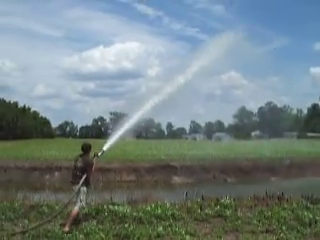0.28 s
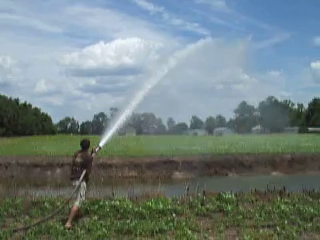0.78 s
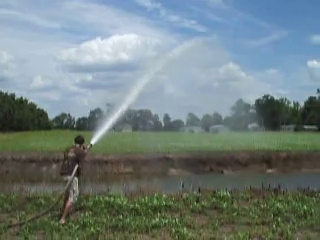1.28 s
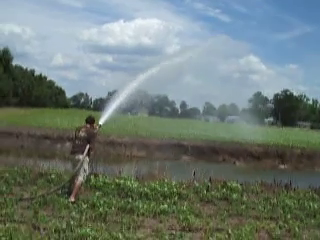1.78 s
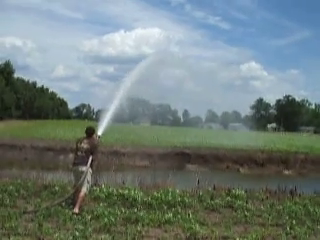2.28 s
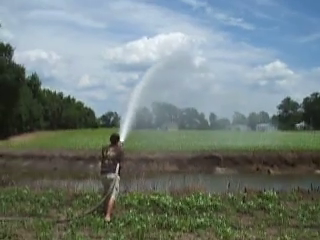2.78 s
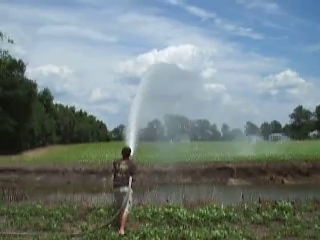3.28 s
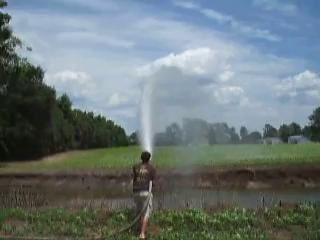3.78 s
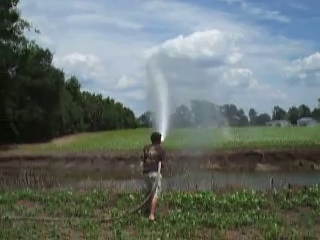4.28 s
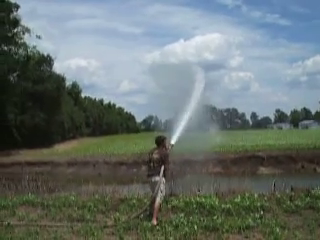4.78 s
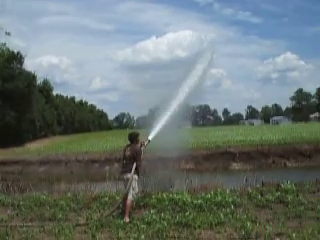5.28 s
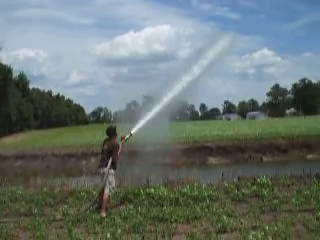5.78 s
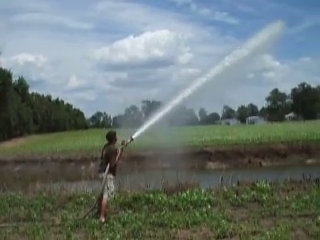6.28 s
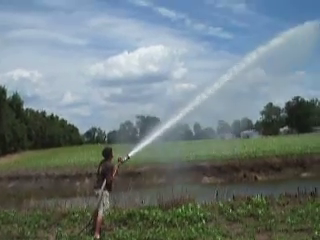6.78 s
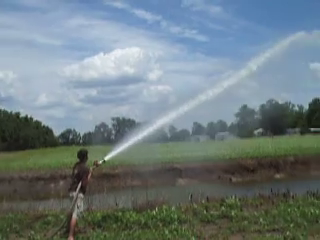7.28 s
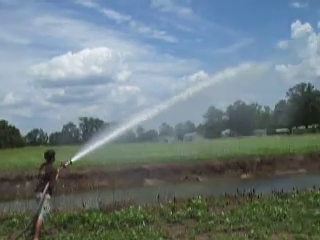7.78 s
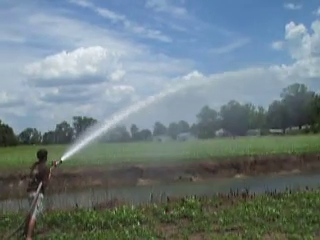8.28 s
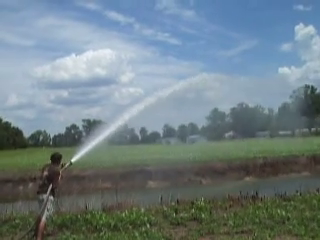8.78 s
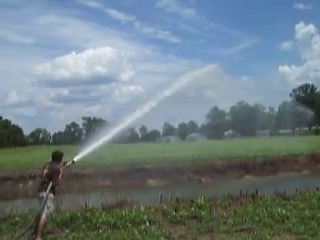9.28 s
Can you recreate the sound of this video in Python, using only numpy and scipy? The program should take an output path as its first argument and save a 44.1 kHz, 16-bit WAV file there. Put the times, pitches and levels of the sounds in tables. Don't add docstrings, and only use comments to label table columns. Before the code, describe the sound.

Outdoors in an open field, a parked truck engine holds a steady, droning roar while driving a water pump with a thin whine. A powerful hose stream hisses and splashes onto a pond throughout. Strong wind thumps and flutters on a small mono microphone for nearly three seconds, then mostly calms. The engine grows clearer around three seconds as the microphone turns, and its automatic gain dips slightly after peaks.

```python
import sys
import numpy as np
from scipy import signal
from scipy.fft import rfft, irfft, next_fast_len
from scipy.io import wavfile
from scipy.ndimage import uniform_filter1d

SR = 44100
rng = np.random.default_rng(int(sys.argv[2]) if len(sys.argv) > 2 else 0)


def master_out(mix):
    frames = np.transpose(np.atleast_2d(mix))
    ceiling = np.clip(frames, -1, 1)
    pcm = np.round(ceiling * 32767).astype(np.int16)
    wavfile.write(sys.argv[1], SR, pcm)


def convert_level_to_amplitude(level_db):
    exponent = np.asarray(level_db, float) / 20
    return 10 ** exponent


N = 422037

# (time [s], full firing cycles per second [Hz])
ENGINE_SPEED = [(0.0, 23.316), (1.5, 23.399), (3.0, 23.432), (4.5, 23.469), (6.0, 23.515), (7.5, 23.556),
                (8.5, 23.58), (9.57, 23.61)]
# (multiple of the cycle rate [1], level [dB])
ENGINE_ORDERS = [(3, -16.5), (4, -23), (5, -2.5), (6, -10.5), (7, -16), (8, -5), (9, -12), (10, -15.5),
                 (11, -20), (12, 0.5), (13, -12.5), (14, -5.0), (15, -12.5), (16, -8.5), (17, -16.5),
                 (18, -8.5), (20, -14), (22, -6.5), (23, -14.5), (25, -14.5), (26, -16), (27, -11.5),
                 (28, -9.5), (29, -16), (30, -14), (32, -10), (36, -10), (40, -14.5), (42, -15.5),
                 (48, -12)]
# (frequency [Hz], level [dB])
ROAR_COLOUR = [(25, -24), (60, -26), (130, -17), (250, -7.5), (400, -2.5), (700, 0), (950, -3),
               (1300, -7.5), (2000, -16)]
# (frequency [Hz], width [Hz], share added [1])
GROUND_ECHO = [
    (556, 60, -0.28),
    (680, 120, 0.033),
    (810, 50, -.2),
]
# (time [s], facing [dB], panel [dB])
FACING = [(0, -2, 7), (0.6, -0.5, 1), (1.1, -2, 7), (1.6, -1, 0.5), (2.1, -1.5, 3.5), (2.7, 0.5, 7),
          (3.15, 3, 10.5), (3.55, 0.5, -0.5), (4.1, 1.5, 8), (4.5, 2.5, 4.5), (4.85, -1, 4.5),
          (5.6, -1, 3.5), (6.15, 0.3, 2), (6.6, 0, 1), (7.3, -0.5, 1), (8.0, 0, 1), (8.8, 0.5, -3),
          (9.57, -1.5, -5)]
# (multiple of the cycle rate [1], level under the mesh [dB])
GEAR_ORDERS = [(68, -8), (74, -11), (78, -4.5), (88, -9), (90, -1), (92, -8), (94, -9)]
# (frequency [Hz], level [dB])
SPLASH_COLOUR = [(500, -22), (900, -8), (1150, 1), (1400, -2), (1800, -1), (2200, -2.5), (2800, -7.5),
                 (3600, -20)]
SPRAY_COLOUR = [(1400, -14.5), (2200, -4.5), (2800, -1), (3500, -1), (4400, -4.5), (5600, -11),
                (7000, -20.5)]
HISS_COLOUR = [(2800, -18.5), (3500, -10.5), (4400, -8), (5600, 2.5), (7000, -0.5), (9500, 1.5)]
# (time [s], share landing on the pond [dB], breakup into fine spray [dB])
AIM = [(0, 0, -1), (0.5, -1, -1.5), (1.35, 1, 0), (1.68, 3, 2), (1.85, 0.5, 0.5), (2.45, 0.5, 0.5),
       (2.7, 0.5, 1.5), (4.0, 0, 1), (4.45, 0.7, 2), (4.65, -0.5, 3), (4.95, 2, 3.5), (5.15, 2, 1),
       (5.75, 1.5, 2), (6.3, 2, 1.5), (7.0, -0.5, 1.3), (7.17, 2, 2), (8.6, 1.5, 1), (9.57, 0.5, 1)]
# (start [s], length [s], rumble level [dB])
GUSTS = [(0.0, 2.8, -43), (4.5, 1.1, -49.5), (0.0, 0.3, -34), (0.36, 0.19, -39.5), (0.622, 0.27, -36),
         (0.94, 0.1, -33), (1.3, 0.16, -42), (1.576, 0.26, -38), (1.962, 0.22, -33.5), (2.188, 0.33, -32.5),
         (2.65, 0.7, -46), (3.866, 0.78, -41), (5.1, 0.2, -47), (5.55, 0.27, -48), (6.82, 0.12, -39),
         (7.3, 0.17, -54), (7.8, 0.25, -47), (8.16, 0.4, -48)]
# (time [s], peak level [dB], pitch [Hz])
PUFFS = [(0.07, -19.5, 156), (0.119, -24.5, 168), (0.171, -14.5, 130), (0.445, -32, 200), (0.492, -10, 257),
         (0.619, -16.5, 143), (0.669, -22, 156), (0.74, -20, 123), (0.83, -21.5, 121), (0.86, -28, 163),
         (0.945, -24.5, 110), (0.981, -16.5, 150), (0.996, -22.5, 130), (1.405, -22, 157),
         (1.651, -20, 183), (1.71, -22.5, 164), (1.767, -24, 149), (1.924, -23, 131), (1.967, -26.5, 107),
         (2.023, -24, 127), (2.049, -15, 163), (2.132, -25, 161), (2.219, -20, 163), (2.271, -14.5, 165),
         (2.312, -16, 197), (2.37, -17.5, 164), (2.44, -22.2, 194), (2.468, -17, 200), (2.791, -18, 191),
         (3.891, -23, 121),
         (0.474, -26, 260), (0.503, -23, 210), (0.77, -26, 54.7), (1.03, -22.5, 70), (1.629, -26.5, 65),
         (2.085, -19, 149), (2.325, -15, 350), (2.346, -33, 260), (2.49, -22, 76), (3.972, -31.5, 70),
         (4.26, -19.5, 128), (4.41, -31, 69.6), (4.541, -34, 90), (5.22, -41, 60), (6.89, -34, 60)]
# (frequency [Hz], level [dB])
RUMBLE_COLOUR = [(20, -19), (40, -4), (60, -3), (90, -5), (120, -8.0)]
FLUTTER_COLOUR = [(80, -6.5), (120, -3), (180, -1), (260, -2), (360, -8), (500, -11), (800, -27)]
# (time [s], drop [dB], negative where the gain lifts instead)
DUCKS = [(0.17, 4), (0.5, -0.5), (1.0, 3), (1.41, 1.2), (1.72, 1), (2.06, 0.5), (2.33, 1.2), (2.48, -0.7),
         (3.5, 0.4), (3.97, 0.4), (4.43, 1), (4.79, 1), (5.439, 1), (6.03, 0.5), (6.41, 0), (6.9, 0.5),
         (7.239, 2.5), (8.0, 0.3), (8.62, -1.1), (9.24, -0.5)]
# (frequency [Hz], level [dB])
HOUSING = [(800, -0.5), (870, 1.0), (950, -1), (1300, -1.6), (1600, 0), (1780, 1.5), (1930, -1.7),
           (2100, 0.0), (2700, 0), (2900, 0.5), (3100, -0.65), (3550, 0.4), (3780, -1), (4200, 1)]
# (frequency [Hz], level [dB])
SMOOTHING = [(5000, 0.0), (6400, 1), (6900, 0), (7400, -5.5), (7900, -11), (8400, -19), (8800, -30.5),
             (9150, -42), (9400, -88)]
EDGES_HZ = 20 * 2 ** np.arange(0, 9.1, 1 / 3)

TONE_DB, ROAR_DB, WHINE_DB = -30.5, -26, -40.5
TONE_FOLLOWS, LOW_FOLLOWS, FOLLOWS_850, ROAR_FOLLOWS, WHINE_FOLLOWS = 0.6, 0.42, 1.7, 0.56, 0.3
SPLASH_DB, SPRAY_DB, HISS_DB = -28, -31.5, -33
HISS_FOLLOWS = 0.8
SPRAY_SHADOWED = 0.5
NOZZLE_TURNS_S, NOZZLE_FADE_DB_PER_S = 5.1, 0.4
GUST_EDGE_S, CALM_DB = 0.11, -53
FLUTTER_OVER_RUMBLE_DB, CALM_FLUTTER_DB = 2.5, -38.5
SHED_DB, SHED_SHARE, SHED_S = -23.5, 0.41, 0.03
DUCK_ATTACK_S, DUCK_RECOVERY_S = 0.0096, 0.38
CONVERTER_HZ = 16000
OFFSET = -0.0704


def engine(turns):
    facing_db, panel_db = in_time(FACING)
    own_db = {32: panel_db - TONE_FOLLOWS * facing_db, 36: FOLLOWS_850 * facing_db}

    def bearing_db(order):
        return own_db.get(order, LOW_FOLLOWS * facing_db * (order < 8))

    throb_db = 1.0 * np.sin(4 * np.pi * turns) + 0.25 * np.sin(2 * np.pi * turns)
    noise = coloured(ROAR_COLOUR, shared_db=1.02, own_db=0.65, shared_rate=7.0, own_rate=2.6)
    direct = convert_level_to_amplitude(ROAR_DB + ROAR_FOLLOWS * facing_db + throb_db) * noise
    roar = direct.copy()
    for hz, width_hz, share in GROUND_ECHO:
        roar += share * signal.lfilter(*signal.iirpeak(hz, hz / width_hz, SR), direct)
    orders = tones(turns, ENGINE_ORDERS, 0.2, 0.004, bearing_db)
    return convert_level_to_amplitude(TONE_DB + TONE_FOLLOWS * facing_db) * orders + roar


def tones(turns, orders, wobble_db, slip, bearing_db):
    out = np.zeros(N)
    for order, level_db in orders:
        phase = 2 * np.pi * (order * turns + start_turn(order)) + slip * order * drift(3.3)
        swell_db = wobble_db * np.sqrt(order) * drift(2.8)
        level = np.sqrt(2) * convert_level_to_amplitude(level_db + bearing_db(order) + swell_db)
        out += level * np.cos(phase)
    return out


def start_turn(order):
    loose = rng.random()
    if order <= 10:
        return 0.27 * (order - 4.4) + 0.28 * (order == 8)
    if order <= 18:
        return -0.3 * (order % 2)
    return loose


def pump(turns):
    facing_db = in_time(FACING)[0]
    whine = tones(turns, GEAR_ORDERS, 0.25, 0.0042, lambda order: 0)
    return convert_level_to_amplitude(WHINE_DB + WHINE_FOLLOWS * facing_db) * whine


def water(turns):
    landing_db, breakup_db = in_time(AIM)
    aside_db = NOZZLE_FADE_DB_PER_S * np.maximum(np.arange(N) / SR - NOZZLE_TURNS_S, 0)
    ripple_db = 0.25 * np.sin(2 * np.pi * turns)
    splash = coloured(SPLASH_COLOUR, shared_db=-0.1, own_db=0.18, shared_rate=11.0, own_rate=6.5)
    splash *= convert_level_to_amplitude(SPLASH_DB + landing_db)
    spray = coloured(SPRAY_COLOUR, shared_db=0.5, own_db=0.5, shared_rate=6.0, own_rate=6.7)
    spray *= convert_level_to_amplitude(SPRAY_DB + breakup_db - SPRAY_SHADOWED * in_time(FACING)[0])
    hiss = coloured(HISS_COLOUR, shared_db=0.4, own_db=0.5, shared_rate=9.0, own_rate=6.3)
    hiss *= convert_level_to_amplitude(HISS_DB + HISS_FOLLOWS * breakup_db - aside_db)
    return convert_level_to_amplitude(ripple_db) * (splash + spray + hiss)


def wind():
    gust = gust_level()
    rumble = coloured(RUMBLE_COLOUR, shared_db=-2.5, own_db=-0.5, shared_rate=14.0, own_rate=5.7)
    rumble = evened(rumble, seconds=0.26)
    flutter = coloured(FLUTTER_COLOUR, shared_db=2.0, own_db=0.5, shared_rate=13.0, own_rate=17.0)
    flutter = evened(flutter, seconds=0.076)
    thumps, shed_power = eddies()
    flutter_power = shed_power + (convert_level_to_amplitude(FLUTTER_OVER_RUMBLE_DB) * gust) ** 2 + convert_level_to_amplitude(2 * CALM_FLUTTER_DB)
    return thumps + (gust + convert_level_to_amplitude(CALM_DB)) * rumble + np.sqrt(flutter_power) * flutter


def gust_level():
    clock = np.arange(N) / SR
    level = np.zeros(N)
    for start_s, length_s, db in GUSTS:
        to_edge_s = np.minimum(clock - start_s, start_s + length_s - clock)
        level += convert_level_to_amplitude(db) * np.clip(to_edge_s / GUST_EDGE_S + 0.5, 0, 1) ** 2
    return level


def eddies():
    thumps, shed_power = np.zeros(N), np.zeros(N)
    half = 3000
    t = np.arange(-half, half) / SR
    events = PUFFS
    for (s, peak_db, hz), start in zip(events, rng.uniform(0.2, 0.45, len(events))):
        at = round(s * SR)
        near = slice(at - half, at + half)
        envelope = np.exp(-(t * hz / 0.72) ** 2)
        thumps[near] += convert_level_to_amplitude(peak_db + 3.0) * envelope * np.sin(2 * np.pi * (hz * t + start))
        shed_power[near] += convert_level_to_amplitude(2 * (SHED_SHARE * peak_db + SHED_DB)) * np.exp(-(t / SHED_S) ** 2)
    return thumps, shed_power


def evened(x, seconds):
    return x / np.sqrt(uniform_filter1d(x ** 2, round(seconds * SR)) + 0.065)


def coloured(spectrum, shared_db, own_db, shared_rate, own_rate):
    out = np.zeros(N)
    together = drift(shared_rate)
    white = rng.standard_normal((2, N))
    hz, level_db = np.transpose(spectrum)
    for k, (low, high) in enumerate(zip(EDGES_HZ, EDGES_HZ[1:])):
        if hz[0] <= np.sqrt(low * high) <= hz[-1]:
            band_filter = signal.butter(2, [low, high], "band", fs=SR, output="sos")
            band = signal.sosfilt(band_filter, white[k % 2])
            colour_db = np.interp(np.log(low * high) / 2, np.log(hz), level_db)
            out += convert_level_to_amplitude(colour_db + shared_db * together + own_db * drift(own_rate)) * band
    return rms_one(out)


def drift(rate):
    coarse = 40
    settling = 2000
    r = np.exp(-2 * np.pi * rate * coarse / SR)
    noise = rng.standard_normal(N // coarse + settling + 2)
    slow = signal.lfilter([1], [1, -2 * r, r * r], noise)[settling:]
    return np.interp(np.arange(N) / coarse, np.arange(len(slow)), rms_one(slow))


def rms_one(x):
    return x / np.sqrt(np.mean(x ** 2) + 1e-20)


def in_time(rows):
    s, *columns = np.transpose(rows)
    return [np.interp(np.arange(N) / SR, s, column) for column in columns]


def gain_control():
    s, drop_db = np.array(DUCKS).T
    since = np.maximum(np.arange(N) / SR - s[:, None], 0)
    return convert_level_to_amplitude(-drop_db @ (np.exp(-since / DUCK_RECOVERY_S) - np.exp(-since / DUCK_ATTACK_S)))


def scene():
    turns = np.cumsum(in_time(ENGINE_SPEED)[0]) / SR
    return (gain_control() * (engine(turns) + pump(turns) + water(turns)) + wind())[None]


def top_cut(x):
    return signal.sosfilt(signal.butter(12, 9040, fs=SR, output="sos"), x)


def record(dry):
    size = next_fast_len(N)
    hz = np.arange(size // 2 + 1) * SR / size
    limited = 0.6 * np.tanh(dry / 0.6)
    housing = convert_level_to_amplitude(np.interp(hz, *np.transpose(HOUSING)))
    passed = irfft(rfft(limited, size) * housing * (hz < CONVERTER_HZ / 2), size)
    mirrored = passed * (1 + 2 * np.cos(2 * np.pi * CONVERTER_HZ * np.arange(size) / SR))
    smoothing = convert_level_to_amplitude(np.interp(hz, *np.transpose(SMOOTHING)))
    smooth = irfft(rfft(mirrored) * smoothing, size)[:, :N]
    return top_cut(smooth + OFFSET)


dry = scene()
out = record(dry)
master_out(out)
```